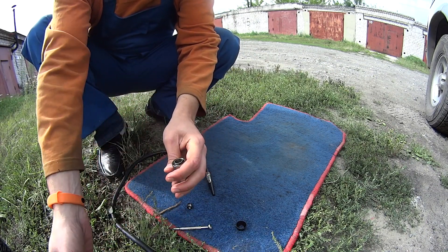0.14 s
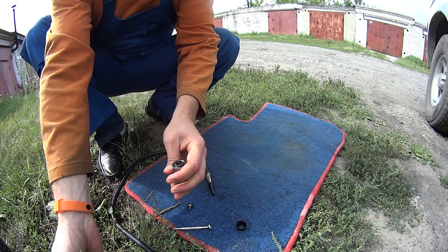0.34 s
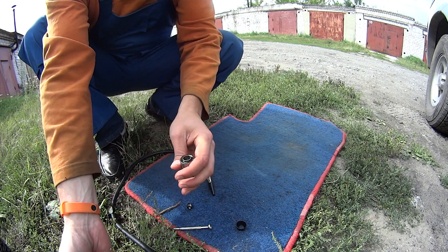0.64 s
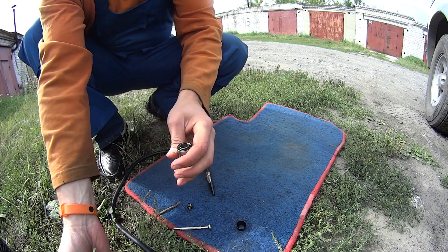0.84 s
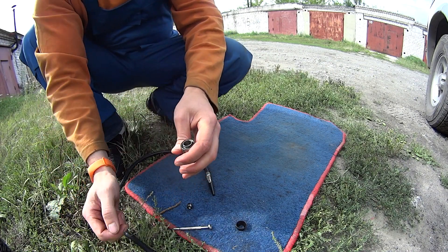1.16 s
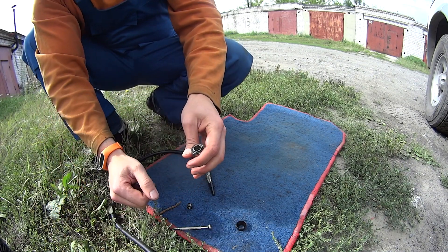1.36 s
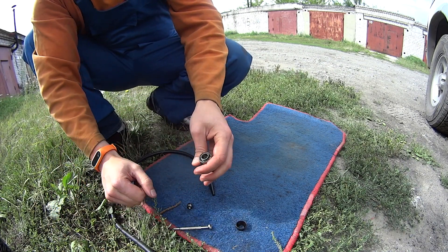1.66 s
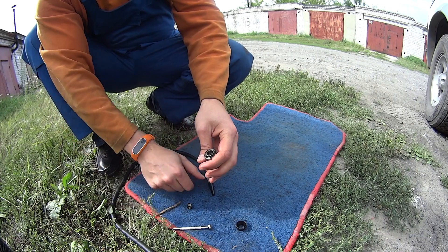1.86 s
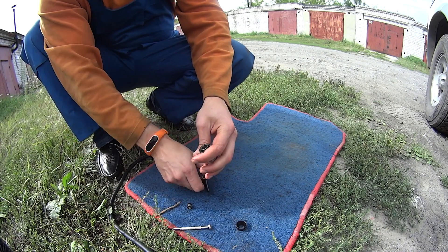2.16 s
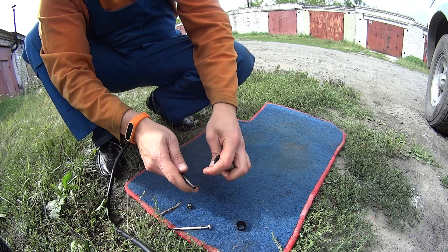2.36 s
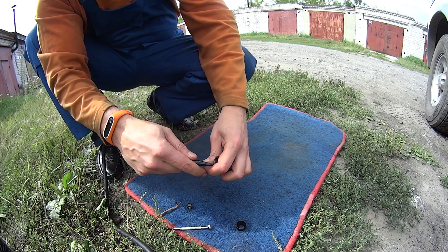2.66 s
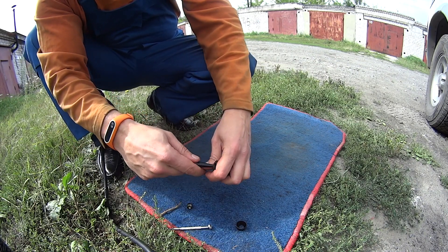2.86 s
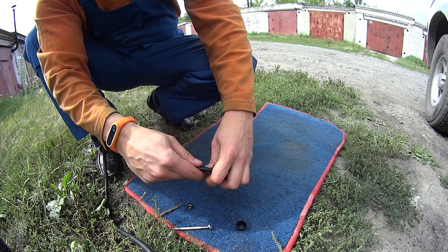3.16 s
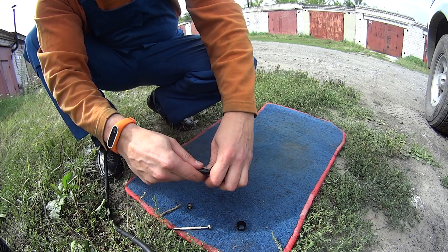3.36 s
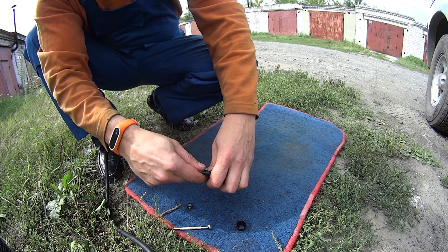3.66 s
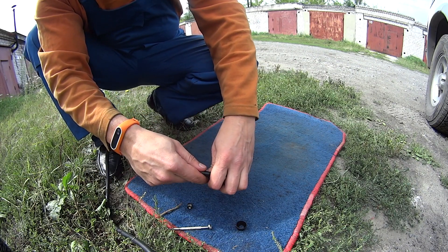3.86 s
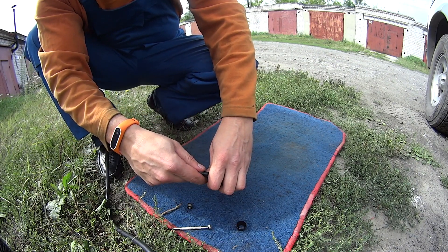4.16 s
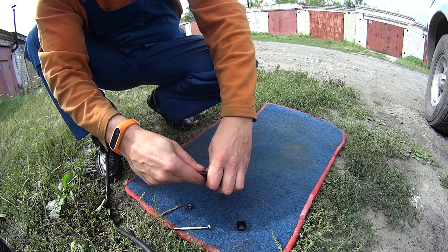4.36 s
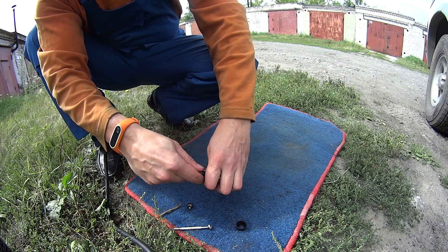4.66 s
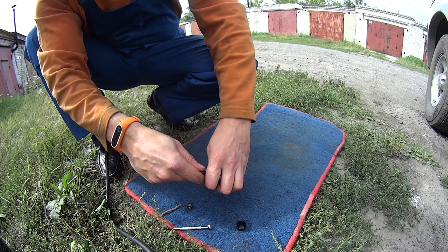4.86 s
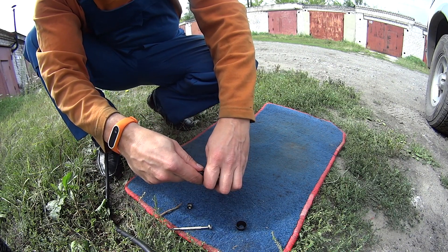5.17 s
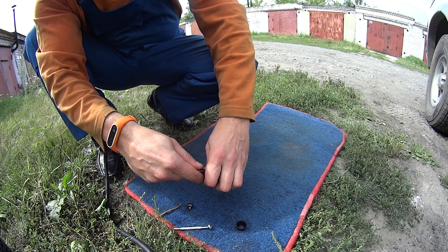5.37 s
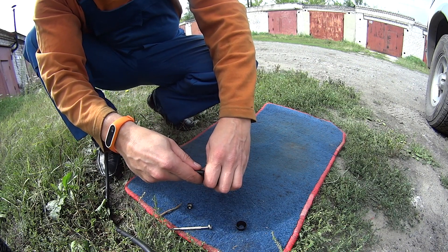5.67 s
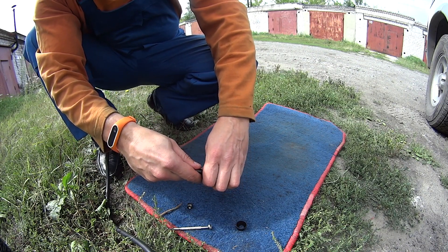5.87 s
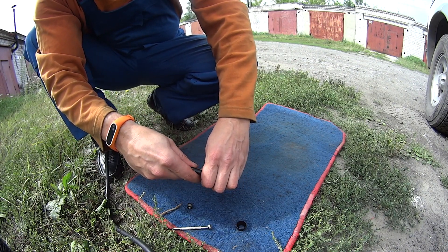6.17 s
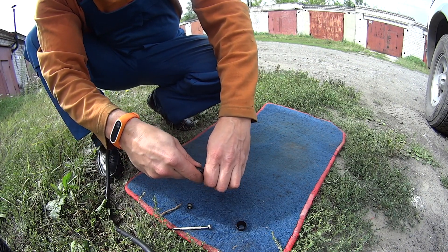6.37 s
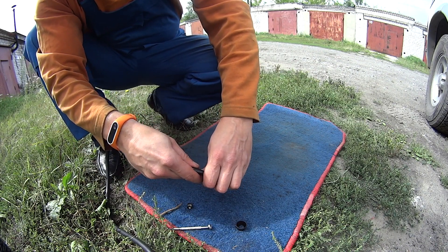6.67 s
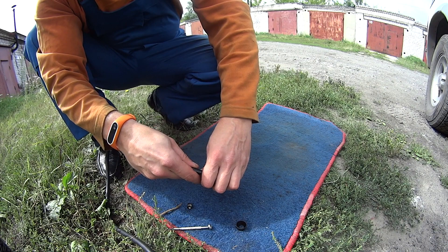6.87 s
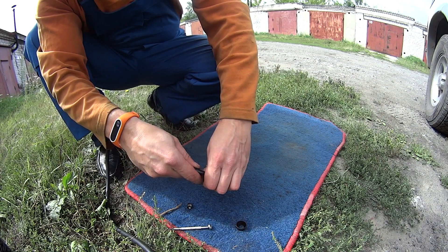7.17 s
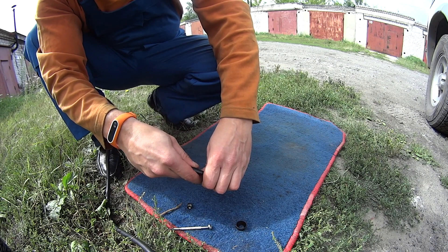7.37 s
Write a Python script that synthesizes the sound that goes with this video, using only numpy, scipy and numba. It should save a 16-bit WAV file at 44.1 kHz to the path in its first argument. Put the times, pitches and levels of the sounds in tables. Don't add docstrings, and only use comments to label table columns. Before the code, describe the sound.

For the first 0.8 s there is only faint distant rumble and breeze in an open yard, with soft low wind thumps near 0.4 and 0.6 s. At 0.81 s a plastic switch snaps sharply. A small piston compressor close to the microphone spins up in about 0.3 s, the empty hose spitting, then hammers steadily at about 52 turns a second: a raspy reed-flutter drone, metallic valve knocks, ringing plate and rattling casing. From 2.7 s a bright, broad air hiss enters, blasting at 2.85 and 3.0 with hard spits near 3.15, then pulsing quickly and shifting in colour. Around 4.7-5.4 s the motor sags and the hiss grows stronger and smoother, then recovers. Air is choked at 6.35 and bursts at 6.42 as the motor dips markedly; another dip and burst come around 7.2. The compressor is still running at the end.

```python
import sys
import numpy as np
from scipy import signal
from scipy.fft import rfft, irfft
from scipy.io import wavfile
from scipy.ndimage import uniform_filter1d
from numba import njit

SR = 44100
rng = np.random.default_rng(int(sys.argv[2]) if len(sys.argv) > 2 else 0)


def amplitude_ratio(level_db):
    exponent = np.asarray(level_db, float) / 20
    return 10 ** exponent


def generate_wav(signal):
    frames = np.transpose(np.atleast_2d(signal))
    scaled = np.clip(frames, -1, 1) * 32767
    pcm = np.round(scaled).astype(np.int16)
    wavfile.write(sys.argv[1], SR, pcm)


N = 331632
TIME = np.arange(N) / SR
HZ = np.maximum(np.fft.rfftfreq(N, 1 / SR), 1)
ON_S = .808
START_ANGLE = -.51


def unit(x):
    return x / np.sqrt(np.mean(x ** 2))


def columns(table):
    s, *rest = np.transpose(table)
    return [np.interp(TIME, s, c) for c in rest]


def over_hz(points):
    f, v = np.transpose(points)
    return np.interp(np.log(HZ), np.log(f), v)


def step(at_s, edge_s):
    return np.clip((TIME - at_s) / edge_s + 1, 0, 1)


def swell(at_s, length_s):
    return np.exp(-.5 * ((TIME - at_s) / length_s) ** 2)


def highpass(x, order, hz):
    return signal.sosfilt(signal.butter(order, hz, "high", fs=SR, output="sos"), x)


def noise(colour=None):
    x = rng.standard_normal(N)
    if colour is None:
        return x
    return unit(irfft(rfft(x) * amplitude_ratio(over_hz(colour)), N))


def walk(rate):
    k = int(SR / rate)
    held = np.repeat(rng.standard_normal(N // k + 1), k)
    return unit(uniform_filter1d(uniform_filter1d(held, k), k)[:N])


@njit
def svf(x, hz, width):
    y, band, low = np.empty(len(x)), 0., 0.
    for i in range(len(x)):
        g, k = np.tan(np.pi * hz[i] / SR), width / hz[i]
        v = (band + g * (x[i] - low)) / (1 + g * (g + k))
        band, low, y[i] = 2 * v - band, low + 2 * g * v, k * v
    return y


def ring(x, modes, sign=-1):
    out = 0
    for k, (f, w, db) in enumerate(modes):
        out = out + sign ** k * amplitude_ratio(db) * signal.lfilter(*signal.iirpeak(f, f / w, SR), x)
    return out


def bump(turns, at, length, scatter_db):
    shifted = turns - at + .5
    size = amplitude_ratio(scatter_db * rng.standard_normal(500))[shifted.astype(int) % 500]
    return size * np.exp(-.5 * ((shifted % 1 - .5) / length) ** 2)


def strikes(turns, blows, scatter_db):
    out = 0
    for at, db in blows:
        edge = np.diff(np.floor(turns - at), prepend=np.floor(START_ANGLE - at))
        out = out + amplitude_ratio(db) * amplitude_ratio(scatter_db * walk(50)) * edge
    return out


# (frequency [Hz], level [dB per Hz])
YARD = [(25, -11), (60, -1.5), (110, -2), (250, -5), (1000, -12.5), (1720, -26.5), (3000, -32),
        (11000, -36.5)]


def yard(duck_db):
    mid, side = noise(YARD), noise(YARD)
    side = 0.33 * side + highpass(side, 1, 300)
    level_db = -44 - 6.5 * step(.722, 0.011) + 1.1 * duck_db + .8 * walk(22)
    return amplitude_ratio(level_db) * (mid + 0.57 * side * np.array([[.8], [-1.2]]))


# (time [s], length [s], level [dB])
GUSTS = [
    (.37, 0.039, -54),
    (0.633, 0.055, -54),
]


def breeze():
    gusts = sum(amplitude_ratio(db) * swell(s, length) for s, length, db in GUSTS)
    low = [unit(ring(noise(), [(91, 25, 0), (266, 44, -6)], sign=1)) for _ in range(2)]
    return gusts * (low[0] + .4 * low[1] * np.array([[1], [-1]]))


# (time [s], depth [dB], release [s])
DUCKS = [
    (2.84, -7, 0.13),
    (2.999, -5.5, 0.21),
    (5.26, -1, 0.6),
    (6.46, -1, 0.05),
    (7.2, -1, 0.034),
]


def ducking():
    attack_s = 0.053
    return sum(db * step(s, attack_s) * np.exp(-np.maximum(TIME - s, 0) / release) for s, db, release in DUCKS)


# (frequency [Hz], level [dB])
RIGHT_SHADOW = [(60, 2), (350, 3), (630, 0), (1130, -8), (2030, -20), (3640, -10), (6550, -4.5),
                (11800, -7)]
# (frequency [Hz], delay [ms])
RIGHT_LAG = [(60, 1), (450, 0.47), (1400, 0.21), (1900, 0.075), (11000, 0.0026)]


def ports(left, right, lag, shadow):
    delay = np.exp(-2j * np.pi * HZ * lag * over_hz(RIGHT_LAG) / 1000)
    right = irfft(rfft(right) * amplitude_ratio(shadow * over_hz(RIGHT_SHADOW)) * delay, N)
    direct = np.array([left, right])
    since, t60_s = TIME[:SR // 4], 0.19
    tail = rng.standard_normal((2, len(since))) * amplitude_ratio(-60 * since / t60_s) * (since > .004)
    tail = highpass(tail / np.linalg.norm(tail[0]), 2, 600)
    return direct + amplitude_ratio(-15) * signal.fftconvolve(direct, tail, axes=1)[:, :N]


# (time [s], peak level [dB])
SWITCH = [
    (0.8081, -10),
]
# (frequency [Hz], width [Hz], level [dB])
SWITCH_RING = [(970, 48, -1), (2300, 820, -7), (5200, 840, -6), (6150, 650, -2), (8150, 520, 2.5),
               (10300, 1200, -15)]


def switch():
    at_s, peak_db = SWITCH[0]
    since = TIME - at_s
    burst = noise() * np.exp(-np.maximum(since, 0) / 0.0033) * step(at_s, 0.00058)
    snap = ring(burst, SWITCH_RING)
    return amplitude_ratio(peak_db) * snap / np.abs(snap).max()


# (frequency [Hz], level [dB per Hz])
JET_COLOUR = [(1470, -61), (2500, -10), (3100, -8.5), (3900, -5), (4700, 0.5), (9020, 2), (11000, -2),
              (14300, -102)]


def hose_air():
    return noise(JET_COLOUR)


def first_puffs(turns, slack):
    running_up = (TIME > ON_S) * (TIME < 1.1)
    return amplitude_ratio(-17) * slack * running_up * bump(turns, 0.94, 0.031, 1) * hose_air()


# (time [s], level [dB], whistle centre [Hz], body level [dB])
JET = [(2.74, -33, 6140, 7), (2.88, -23, 6950, -7), (2.99, -27.5, 6640, -5), (3.13, -27.5, 5200, -9),
       (3.36, -26.5, 5950, -5), (3.47, -29, 7100, 5), (3.72, -28, 6500, -2), (3.98, -28.5, 7600, 7),
       (4.36, -27.5, 8300, -1.5), (4.95, -25, 7200, -5), (5.11, -24, 8550, -9), (5.27, -22.5, 6900, -2),
       (5.69, -28, 7000, 3), (6.03, -26, 5300, -3), (6.4, -27, 5270, -6), (6.56, -32, 9000, -6),
       (6.96, -26, 9100, -6.5), (7.06, -27.5, 5800, -3.5)]
# (time [s], extra level [dB])
SPITS = [
    (2.83, 3),
    (2.868, 1),
    (3.14, 6),
    (3.178, 5.5),
]
# (seal time [s], burst time [s], burst end [s], seal level [dB], burst level [dB])
SEALS = [
    (6.338, 6.42, 6.58, -7.5, 7.5),
    (7.03, 7.17, 7.25, 2.5, 6),
]


def jet(turns, slack):
    edge_s = 0.016
    level_db, whistle_hz, body_db = columns(JET)
    whistle_hz = whistle_hz + step(7.22, 0.073) * (8600 - whistle_hz)
    level_db = level_db - 3 * step(7.22, edge_s)
    level_db = level_db + sum(db * swell(s, .004) for s, db in SPITS)
    for seal, burst, end, seal_db, burst_db in SEALS:
        shut, free, done = (step(s + edge_s / 2, edge_s) for s in (seal, burst, end))
        level_db = level_db + seal_db * (shut - free) + burst_db * (free - done)
    steady = np.clip(7.25 * slack, 0, 1)
    puffs = unit(bump(turns - .02, 0.94, 0.11, 1.5) + .5 * bump(turns - .02, 0.33, 0.1, 0.89))
    flow = steady + (1 - steady) * puffs
    centre_hz = np.clip(whistle_hz * (1 + 0.043 * walk(25)), 500, 15000)
    whistle = unit(svf(hose_air(), centre_hz, 2370.0))
    hiss = whistle * amplitude_ratio(0.5 * walk(18)) + amplitude_ratio(body_db) * hose_air()
    hiss = hiss / np.sqrt(1 + amplitude_ratio(2 * body_db))
    return amplitude_ratio(level_db) * np.clip((TIME - JET[0][0]) / 0.06, 0, 1) * flow * hiss


# (time [s], lower [Hz], upper [Hz], depth [0-1])
HANDS = [
    (2.8, 6800, 8600, 1),
    (3.1, 6760, 9700, 0.56),
    (3.35, 7000, 11200, 0.5),
    (3.9, 7300, 11200, 0.37),
    (4.4, 8200, 11800, 0.7),
]


def hands(x):
    lower_hz, upper_hz, depth = columns(HANDS)
    for hz in (lower_hz, upper_hz):
        x = x - np.clip(depth, 0, 1) * svf(x, hz, 1000.0)
    return x


# (time [s], speed [turns per s])
SPEED = [(0.92, 51.4), (1.98, 51.77), (3.5, 51.85), (4.08, 50.77), (4.13, 49.92), (4.58, 50.65),
         (4.77, 48.32), (5.35, 47.09), (5.42, 49.34), (5.77, 51.28), (6.2, 49.68), (6.29, 50.44),
         (6.48, 42.17), (6.57, 45.65), (6.69, 50.41), (6.94, 50.92), (7.21, 45.37), (7.36, 50.69)]


def crank():
    loaded = uniform_filter1d(columns(SPEED)[0], int(.079 * SR))
    return loaded * np.tanh(np.maximum(TIME - .7803, 0) / .118)


# (multiple of the turn, level [dB])
SHAKE = [(1, 7), (2, 15), (3, 9.5), (4, 8), (5, -1), (6, -16)]


def shake(turns):
    return unit(sum(amplitude_ratio(db + .5 * walk(22)) * np.cos(2 * np.pi * k * (turns - .1)) for k, db in SHAKE))


# (frequency [Hz], level [dB per Hz])
BUFFET = [(60, -39), (130, 8), (260, 6), (500, -22), (2000, -50)]


def buffet():
    return noise(BUFFET)


# (frequency [Hz], width [Hz], level [dB], crank angle [turns], length [turns])
RATTLE = [(1450, 400, -41, 0.85, 0.19), (2090, 580, -42.5, 0.27, 0.19), (3065, 100, -53, 0.63, 0.13),
          (4700, 150, -53, 0.35, 0.25), (5800, 170, -46, 0.69, 0.19), (5660, 740, -43, 0.89, 0.092),
          (7560, 1400, -47, 0.72, 0.087), (8120, 280, -47, 0.82, 0.1), (9530, 610, -44.5, 0.93, 0.19),
          (10830, 84, -49, 0.89, 0.026), (7000, 7800, -45.5, 0.48, 0.051)]


def rattle(turns):
    out = 0
    for f, w, db, at, length in RATTLE:
        same = np.interp(turns % 1, np.linspace(0, 1, 850), rng.standard_normal(850))
        clatter = (noise() + 1.1 * same) * (0.15 + bump(turns, at, length, 1.3))
        out = out + amplitude_ratio(db) * unit(ring(clatter, [(f, w, 0)]))
    return out


def far_side(turns):
    casing = [(f, w, db + 40) for f, w, db, *_ in RATTLE[:-1]]
    return amplitude_ratio(-20) * unit(ring(noise() * (0.51 + bump(turns, 1.0, 0.2, 1.5)), casing))


# (frequency [Hz], width [Hz], level [dB])
PLATE = [(2990, 100, -1), (4530, 78, 4.5), (5850, 90, 4), (6360, 110, -13), (2350, 330, -1.5)]


def plate(turns):
    hits = strikes(turns + 0.0037 * walk(50), [(.27, 1)], scatter_db=3.0)
    return unit(ring(ring(hits, PLATE), [(f, 3 * w, 0) for f, w, _ in PLATE], sign=1))


# (frequency [Hz], width [Hz], level [dB])
HEAD = [(1520, 29, -9), (1636, 24, -9), (2302, 167, -10), (2980, 62, -11.5)]
# (frequency [Hz], width [Hz], level [dB])
BRACKET = [(1399.5, 13.6, 6.5), (1438, 31, -5), (1889, 37, -2)]


def knock(turns):
    hits = strikes(turns, [(.78, -1), (.9, 5.5), (.27, -9.5), (0.73, 5)], scatter_db=2.7)
    head = unit(ring(hits + 0.012 * noise() * bump(turns, 1.0, .15, 2.6), HEAD))
    bracket = unit(ring(strikes(turns, [(.72, 0)], scatter_db=1.0), BRACKET))
    return head + amplitude_ratio(3.0) * bracket


# (frequency [Hz], width [Hz], level [dB])
SEAT = [(990, 80, -1.5), (1072, 118, -5.5), (911, 29, -8.5)]


def seat(turns, slack):
    blows = [(0.4312, -4), (0.049, -1.5), (0.1913, 3.5), (0.32, -7), (0.85, -3)]
    hits = strikes(turns, blows, scatter_db=1.5)
    since_top = TIME - np.interp(np.floor(turns + .6) - .6, turns, TIME)
    song = np.clip(slack, 0, .35) * bump(turns, 0.89, 0.05, 1) * np.sin(2 * np.pi * 995 * since_top)
    return unit(ring(hits + 0.0042 * noise(), SEAT)) + 14.4 * song


# (overtone, level [dB])
REED = [(1, 17), (2, 0.5), (3, -5.5), (4, -16), (5, -17.5)]
# (frequency [Hz], width [Hz], level [dB])
AIRBOX = [(352.5, 39, 4), (465, 37, -1.5), (537.6, 44, 1), (765, 56, 8), (990, 48, -24), (960, 35, 15)]
# (frequency [Hz], level [dB per Hz])
INTAKE_RUSH = [(100, -109), (300, -2), (480, 4), (1050, 4), (1400, -3.5), (3000, -18)]


def reed(turns, slack):
    angle, turn = turns % 1, np.floor(turns)
    jitter = .004 * rng.standard_normal(500)[turn.astype(int) % 500]
    hz = 400 * (1 + 7.68 * np.minimum(angle, .6) ** 3 + 0.35 * slack) * (1 + jitter)
    cycles = np.cumsum(hz) / SR
    cycles -= np.interp(turn, turns, cycles)
    suction = np.clip(angle / 0.051, 0, 1) * np.clip((.5 - angle) / 0.14, 0, 1)
    suction = suction * (1 + 1.35 * angle) * (turns > 0)
    flutter = 0
    for k, db in REED:
        wave = np.sin(2 * np.pi * (k * cycles + 0.34 * k - 0.35 / k))
        flutter = flutter + amplitude_ratio(db) * suction ** (1 + 0.83 * k) * wave
    flutter = flutter * amplitude_ratio(0.5 * walk(40))
    rush = amplitude_ratio(-16) * (1.47 + suction) * noise(INTAKE_RUSH)
    return unit(highpass(flutter + ring(flutter, AIRBOX, sign=0.93), 3, 280)) + rush


def pump(turns, slack, labour, duck_db):
    run_up = slack - labour
    seat_db = -8 + 35 * np.minimum(labour, .09) + 0.12 * duck_db + 5 * run_up + 10 * (1 - step(0.872, 0.048))
    shake_db = -19 - 34 * labour + 0.6 * duck_db - 15 * run_up
    valves = reed(turns, slack) + amplitude_ratio(seat_db) * seat(turns, slack)
    valves = valves + amplitude_ratio(-15.5 - 50 * labour) * knock(turns)
    valves = valves + amplitude_ratio(-16.5 - 27 * slack) * plate(turns)
    body = amplitude_ratio(shake_db) * (shake(turns) + amplitude_ratio(-9.5) * buffet()) + amplitude_ratio(25.5) * rattle(turns)
    return valves + body


def scene():
    speed, duck_db = crank(), ducking()
    turns = START_ANGLE + np.cumsum(speed * np.maximum(TIME > ON_S, 1e-9)) / SR
    slack = 1 - speed / 51.8
    labour = np.clip(slack, 0, .2) * (TIME > 1.1)
    pump_db = -23 - 19 * labour + duck_db - 11 * (1 - step(.85, 0.026))
    loud = np.clip((TIME - ON_S) / 0.027, 0, 1) * amplitude_ratio(pump_db)
    machine = loud * pump(turns, slack, labour, duck_db) + first_puffs(turns, slack) + switch()
    uneven = loud * far_side(turns)
    air = hands(jet(turns, slack))
    near = ports(machine + uneven, machine - uneven, lag=0.79, shadow=0.68)
    return near + ports(air, air, lag=0.52, shadow=0.4) + yard(duck_db) + breeze()


def roll_off(x):
    return signal.sosfilt(signal.butter(12, 12380, fs=SR, output="sos"), x)


def record(dry):
    cut = signal.sosfilt(signal.ellip(10, .2, 70, 11080, fs=SR, output="sos"), dry)
    rounded = cut / (1 + np.abs(cut / .45) ** 6) ** (1 / 6)
    return roll_off(rounded)


dry = scene()
out = record(dry)
generate_wav(out)
```